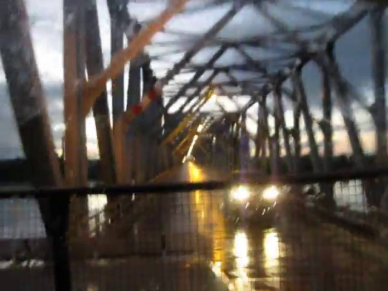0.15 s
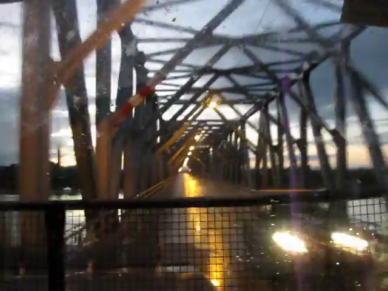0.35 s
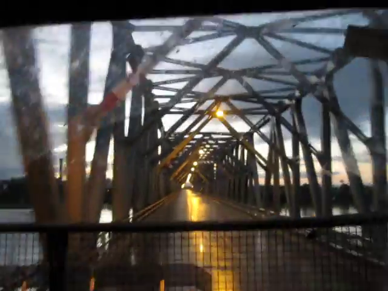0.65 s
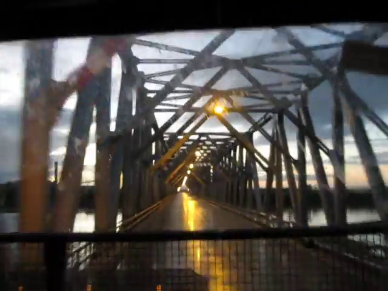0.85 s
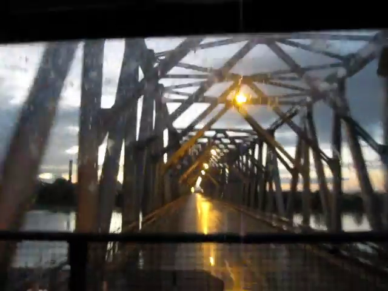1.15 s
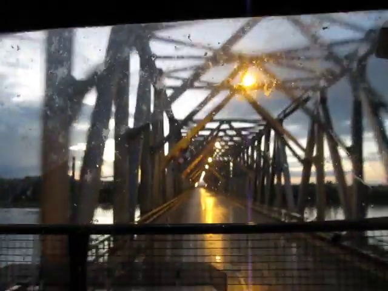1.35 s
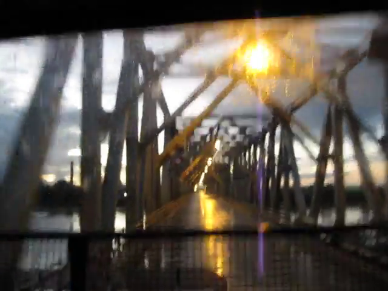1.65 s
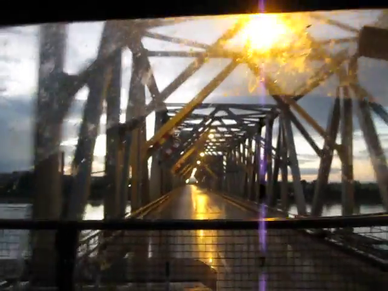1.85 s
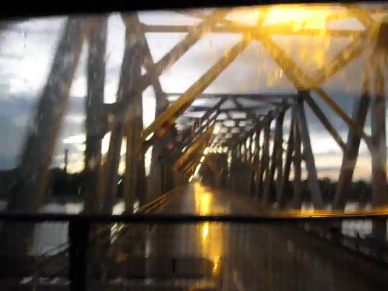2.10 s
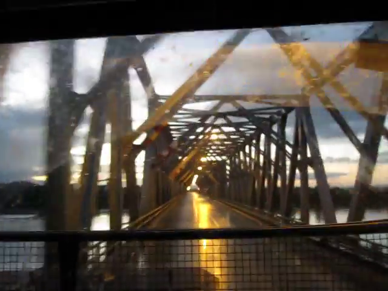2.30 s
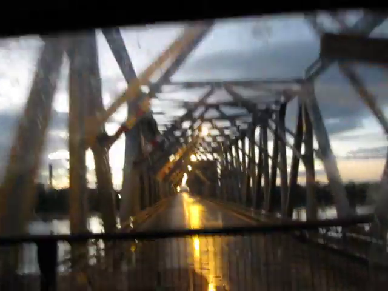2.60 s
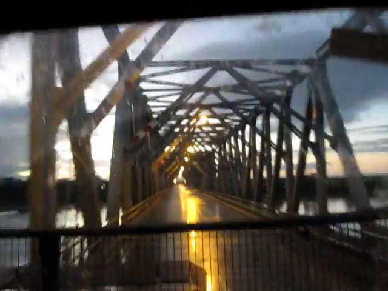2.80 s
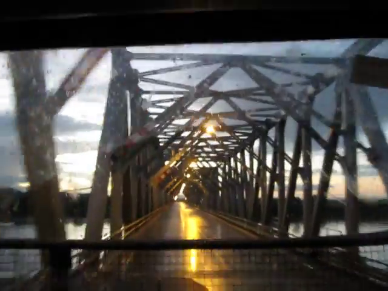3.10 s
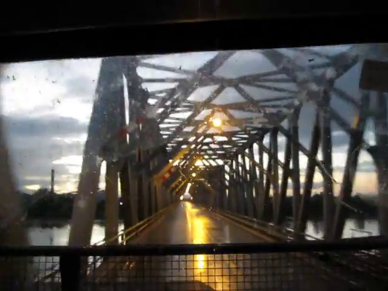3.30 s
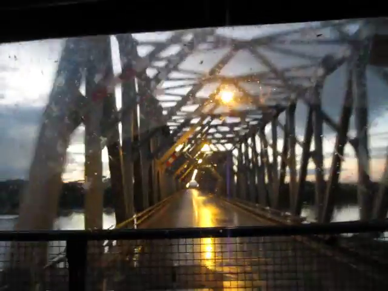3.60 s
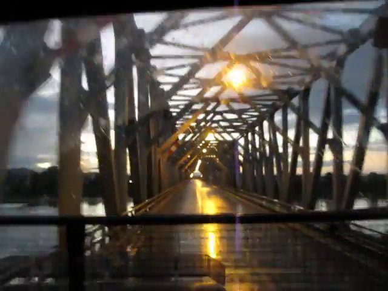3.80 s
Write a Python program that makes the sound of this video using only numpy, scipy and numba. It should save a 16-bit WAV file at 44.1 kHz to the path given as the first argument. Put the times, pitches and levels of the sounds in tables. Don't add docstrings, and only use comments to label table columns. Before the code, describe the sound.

Steady low road rumble and diesel hum fill a truck cab on a steel bridge; an oncoming car hisses past early, then joint thuds and small squeaks continue, heard through a rough camera microphone.

```python
import sys
import numpy as np
from scipy import signal
from scipy.io import wavfile
from scipy.ndimage import uniform_filter1d
from numba import njit

SR = 44100
rng = np.random.default_rng(int(sys.argv[2]) if len(sys.argv) > 2 else 0)


def persist_wave(psi):
    counts = np.round(np.clip(psi, -1, 1) * 32767).astype(np.int16)
    wavfile.write(sys.argv[1], SR, np.atleast_2d(counts).T)


def undo_db(level):
    steps = np.asarray(level, float) / 20
    return 10 ** steps


N = 174195

# (time [s], thud level [dB], crack level [dB], length [s], gain change afterwards [dB])
KNOCKS = [(0.21, -25.5, -46, 0.0096, -1), (0.772, -18, -43, 0.01, 0), (0.94, -39, -31, 0.021, -0.5),
          (1.813, -24, -25, 0.011, -1.5), (1.914, -17.5, -41.5, 0.012, -2.5),
          (1.927, -16.5, -21, .013, -3.5), (2.349, -28.5, -25.5, 0.011, -1.5), (2.39, -20, -44, 0.0097, 0),
          (2.565, -20, -23, 0.0086, -2.5), (2.689, -28, -40.5, 0.016, 0), (2.922, -15.5, -37, 0.0074, -1),
          (3.244, -26.5, -31.5, 0.025, 1), (3.278, -36, -41.5, 0.013, -2.5),
          (3.583, -19, -19, 0.0095, -4.5), (3.639, -18.5, -38, 0.013, 0.5),
          (3.681, -16.5, -19, 0.014, -0.5), (3.896, -24, -25.5, 0.018, 2.5)]
CRACK_HZ, CRACK_WIDTH_HZ = 3200, 2400


def level(x, db):
    return x * undo_db(db) / np.sqrt(np.mean(x ** 2))


def curve(table, col, t):
    points = np.array(table)
    return np.interp(t, points[:, 0], points[:, col])


@njit
def svf(x, hz, width):
    y = np.empty(len(x))
    b, l = 0., 0.
    for i in range(len(x)):
        g, k = np.tan(np.pi * hz[i] / SR), width / hz[i]
        v = (b + g * (x[i] - l)) / (1 + g * (g + k))
        b = 2 * v - b
        l = l + 2 * g * v
        y[i] = k * v
    return y


def band(hz, width, steep=True):
    hz = hz * np.ones(N)
    y = svf(rng.standard_normal(N), hz, 1. * width)
    if steep:
        y = svf(y, hz, 1.72 * width)
    return level(y, 0)


def walk(rate):
    k = int(SR / rate)
    steps = np.repeat(rng.standard_normal(N // k + 1), k)
    return 1.13 * uniform_filter1d(uniform_filter1d(steps, k), k)[:N]


def even(x):
    window_s = .13
    return x / np.sqrt(uniform_filter1d(x ** 2, size=int(window_s * SR)) + 0.067)


def road(t, firing):
    # (frequency [Hz], level per Hz [dB])
    spectrum = [(20, -0.5), (75, -12), (150, -7), (400, -14), (800, -14), (1200, -19.5), (2300, -27.5),
                (6000, -33)]
    # (frequency [Hz], width [Hz], level [dB])
    cab_modes = [(26, 4, -40), (44, 4.6, -32), (852.2, 18, -34.5), (290, 41, -37), (451.6, 41, -35.5),
                 (535, 60, -32.5), (648.6, 27, -41), (764, 41, -41.5), (828.6, 66, -35.5), (954, 27, -44),
                 (1750, 350, -33)]
    # (time [s], level [dB], centre [Hz])
    deck_boom = [(0, -30, 101.5), (.25, -36, 104.8), (.5, -26, 100), (.68, -37, 108.4), (.85, -23.5, 107.4),
                 (1.1, -27, 100), (1.3, -21, 101.5), (1.5, -28, 108), (1.72, -23, 103.8),
                 (1.9, -19.5, 106.4), (2.1, -27, 110.6), (2.3, -21.5, 110.6), (2.6, -30.5, 107),
                 (2.95, -19, 104.7), (3.15, -24, 102.8), (3.5, -39, 109.2), (3.72, -22.5, 104.5),
                 (3.95, -19.5, 102.7)]
    spectrum_hz, spectrum_db = np.transpose(spectrum)
    rumble, swell, rattle = 0, walk(2.6), walk(14)
    for hz in 22 * 2 ** np.arange(0, 8.3, 1 / 3):
        high = min(hz / 450.0, 1)
        db = np.interp(np.log(hz), np.log(spectrum_hz), spectrum_db) + 10 * np.log10(hz)
        db = db + 0.9 * swell + 0.5 * walk(9) + high * 1.4 * rattle
        clatter = 1 + high * .09 * np.cos(firing)
        rumble = rumble + undo_db(db) * even(band(hz, hz / 4)) * clatter
    cab = sum(undo_db(db + 3.0 * walk(5)) * even(band(hz, width)) for hz, width, db in cab_modes)
    boom = undo_db(curve(deck_boom, 1, t) - 0.5) * even(band(curve(deck_boom, 2, t), 35.6))
    return level(rumble, -21.5) + cab + boom


def knocks(t):
    floor_hz = (280, 345, 430, 520, 620)
    floor_db = (-1, 3, -2, -3, -7)
    ring_on_db, ring_on_lengths = -9, 3
    thud, crack, out = band(397, 450), band(CRACK_HZ, CRACK_WIDTH_HZ, False), 0
    for s, thud_db, crack_db, length, _ in KNOCKS:
        u = np.clip((t - s) / length, 0, 30)
        ring = 0
        for hz, db in zip(floor_hz, floor_db):
            struck_hz = hz * (1 + 0.034 * rng.standard_normal())
            ring = ring + undo_db(db) * np.sin(2 * np.pi * struck_hz * (t - s) + rng.uniform(0, 2 * np.pi))
        thud_shape = np.exp(-u ** 2) + undo_db(ring_on_db) * np.exp(-u / ring_on_lengths)
        thud_shape = (1 - np.exp(-u / 0.038)) * thud_shape
        crack_shape = (1 - np.exp(-u / 0.039)) * np.exp(-u / 0.82)
        out = out + undo_db(thud_db) * (0.83 * thud + ring) * thud_shape
        out = out + undo_db(crack_db) * crack * crack_shape
    return out


def car(t):
    # (time [s], tyre hiss level [dB], tread whine centre [Hz], whine level [dB])
    passing = [(0, -63, 1750, -44), (.34, -40.5, 1750, -39.5), (.43, -28.5, 1640, -24),
               (.48, -31, 1600, -33), (.55, -29.5, 1576, -28), (.6, -26, 1473, -22.5),
               (.64, -21.5, 1293, -17.5), (.7, -23.5, 1320, -23), (.76, -24, 1290, -29.5),
               (.83, -30.5, 1260, -36.5), (1.1, -46, 1265, -50)]
    whine_db = curve(passing, 3, t) + 4.3 * walk(30) - 3
    whine = undo_db(whine_db) * band(curve(passing, 2, t), 380)
    hiss = band(2740, 3900, False)
    hum = undo_db(-5) * band(420, 130)
    gusts = undo_db(curve(passing, 1, t) + 1.1 * walk(40))
    return (hiss + hum) * gusts + whine


def engine(t):
    # (time [s], rate [Hz])
    firing_rate = [
        (0, 58.25),
        (1, 58.32),
        (1.6, 58.45),
        (2.2, 58.8),
        (2.8, 59.26),
        (3.4, 59.63),
        (3.95, 59.8),
    ]
    orders = (3, 5, 6, 9, 12, 13, 15, 24, 27, 29, 30, 33, 36, 44, 45)
    order_db = (-31.5, -36, -34, -32.5, -47.5, -41, -41, -47.5, -40.5, -45, -43, -39, -45.5, -42, -53.5)
    order_slope = (0, 2, 1, -4, 1, 2, 2.5, 1, 3, -7, 2, 1, -8.5, 0.5, -8)
    rate = curve(firing_rate, 1, t) * (1 + 0.00031 * walk(3.02))
    turn = 2 * np.pi * np.cumsum(rate) / 3 / SR
    hum = 0
    for order, db, slope in zip(orders, order_db, order_slope):
        gain = undo_db(db + slope * (t - 1.0) + 3.0 * walk(4)) * np.sqrt(2)
        hum = hum + gain * np.sin(order * turn + rng.uniform(0, 2 * np.pi))
    return hum, 3 * turn


def squeaks(t):
    # (time of peak [s], peak level [dB], pitch [Hz])
    slips = [(0.149, -31.5, 3120), (0.311, -31, 3200), (0.434, -20, 1680), (1.535, -28.5, 2930),
             (1.551, -23.5, 2910), (1.641, -25, 3230), (1.651, -25.5, 3140), (1.815, -28, 2480),
             (2.528, -26.5, 3370), (2.537, -26.5, 3330), (3.247, -22.5, 2246), (3.245, -26.5, 3880),
             (3.417, -17.5, 2930), (3.527, -23, 3200), (3.667, -22.5, 2860), (3.778, -14.5, 2926),
             (3.783, -26, 3710), (3.863, -31.5, 3200), (3.909, -20.5, 2067)]
    swell_s, fade_s, bounce_s, bounce_db = 0.0037, 0.0025, 0.016, -15.5
    out, scrape = np.zeros(N), undo_db(-20) * band(CRACK_HZ, CRACK_WIDTH_HZ, False)
    for s, db, hz in slips:
        near = slice(max(int((s - .03) * SR), 0), int((s + .05) * SR))
        octave = (2800 < hz < 3100) * undo_db(-9)
        for late, drop_db in ((0, 0), (bounce_s, bounce_db)):
            u = t[near] - s - late
            grit = 1 + 1.2 * uniform_filter1d(rng.standard_normal(len(u)), size=40)
            glide = 1 + 3 * rng.standard_normal() * u
            wobble = 2.2 * uniform_filter1d(rng.standard_normal(len(u)), size=70)
            slip = 2 * np.pi * hz * u * glide + wobble
            shape = np.exp(-(u / np.where(u < 0, swell_s, fade_s)) ** 2 / 2)
            tone = np.sin(slip) + octave * np.sin(2 * slip)
            out[near] += undo_db(db + drop_db) * grit * shape * (scrape[near] + tone)
    return out


def drone(t):
    # (time [s], level [dB])
    driveline = [(0.0, -41), (0.04, -31), (0.08, -35.5), (0.21, -23), (0.73, -48), (0.93, -24), (1.34, -36),
                 (1.77, -27), (2.0, -35.5), (2.18, -22), (2.36, -32.5), (2.54, -25), (2.6, -29.5),
                 (3.59, -31.5), (3.62, -40), (3.95, -32.5)]
    return undo_db(curve(driveline, 1, t) - 0.5) * even(band(256.9, 8.1))


def turbo(t):
    # (time [s], whistle [Hz], level [dB])
    spool = [
        (0, 5330, -46),
        (.6, 5400, -46),
        (1.1, 5480, -44),
        (1.45, 5550, -42.5),
        (1.75, 5640, -44),
        (2.15, 5850, -46),
        (2.5, 6350, -44),
        (2.8, 6680, -43),
        (3.3, 6750, -46),
        (3.95, 6800, -52),
    ]
    width_hz, spread_hz_per_s = 90, 250
    whistle_hz = curve(spool, 1, t)
    thin = band(whistle_hz, width_hz)
    wide = band(whistle_hz, width_hz + 2 * spread_hz_per_s)
    blur = np.clip(t - 1.7, 0, 1) ** .5
    flicker = undo_db(curve(spool, 2, t) + 3.1 * walk(14))
    return flicker * ((1 - blur ** 2) * thin + 1.5 * blur * wide)


def scene():
    t = np.arange(N) / SR
    hum, firing = engine(t)
    mix = road(t, firing) + knocks(t) + car(t) + hum + squeaks(t) + drone(t) + turbo(t)
    return mix[None]


def roll_off(x):
    return signal.sosfilt(signal.butter(12, 6880, fs=SR, output="sos"), x)


def record(dry):
    t = np.arange(N) / SR
    duck_attack_s, duck_release_s = .022, .15
    duck_db = -4 * np.exp(-((t - .7) / .075) ** 2 / 2)
    for s, _, _, length, db in KNOCKS:
        u = np.maximum(t - s - length, 0)
        duck_db = duck_db + 1.67 * db * (1 - np.exp(-u / duck_attack_s)) * np.exp(-u / duck_release_s)

    hold_s, squeeze = .04, .15
    hold = np.exp(-1 / (hold_s * SR))
    mean_power = np.mean(dry ** 2)
    power = signal.lfilter([1 - hold], [1, -hold], dry ** 2 - mean_power) / mean_power + 1
    gained = dry * undo_db(duck_db) * np.maximum(power, .1) ** (-squeeze / 2)

    ceiling = .7
    clipped = ceiling * np.tanh(gained / ceiling)
    hissy = clipped + undo_db(-43) * rng.standard_normal(N)
    soft = signal.sosfilt(signal.butter(2, 7000, fs=SR, output="sos"), hissy)

    step = 4
    kept = step * soft * (np.arange(N) % step == 0)
    taps = signal.firwin(numtaps=65, cutoff=5480, window=("kaiser", 9), fs=SR)
    smooth = signal.fftconvolve(kept, taps[None], mode="same")
    return roll_off(smooth + .0011)


dry = scene()
out = record(dry)
persist_wave(out)
```